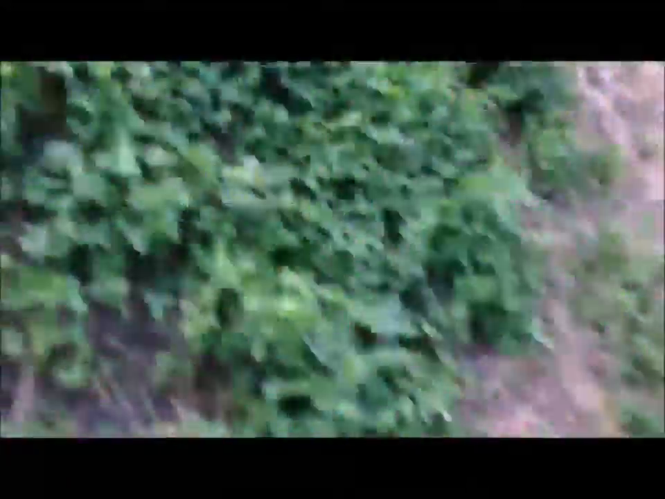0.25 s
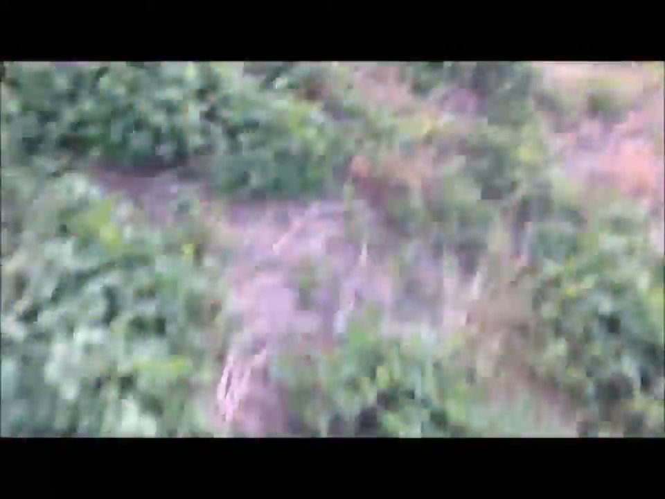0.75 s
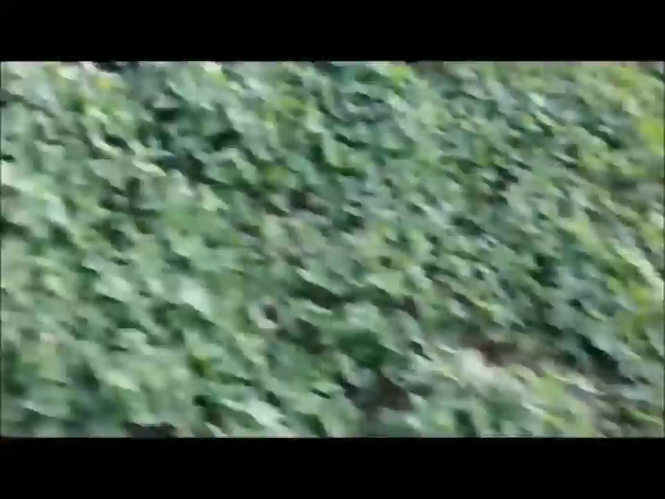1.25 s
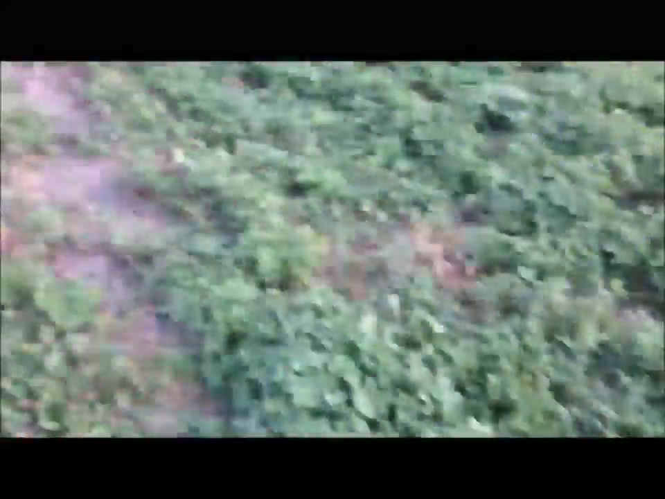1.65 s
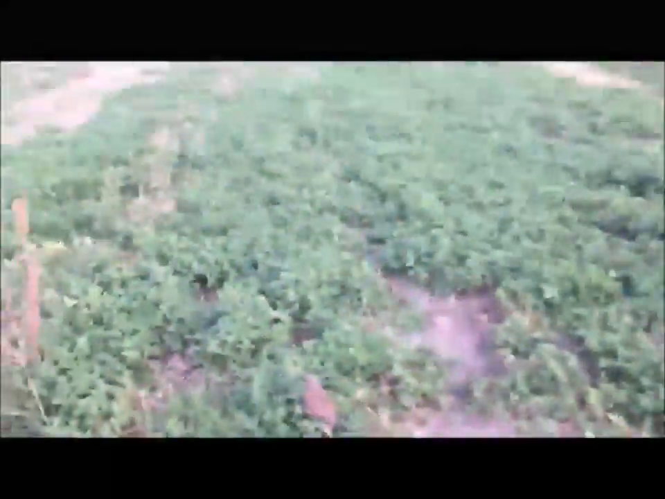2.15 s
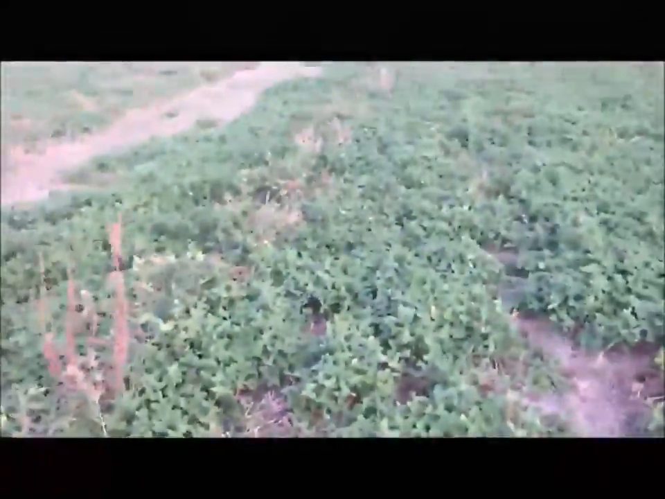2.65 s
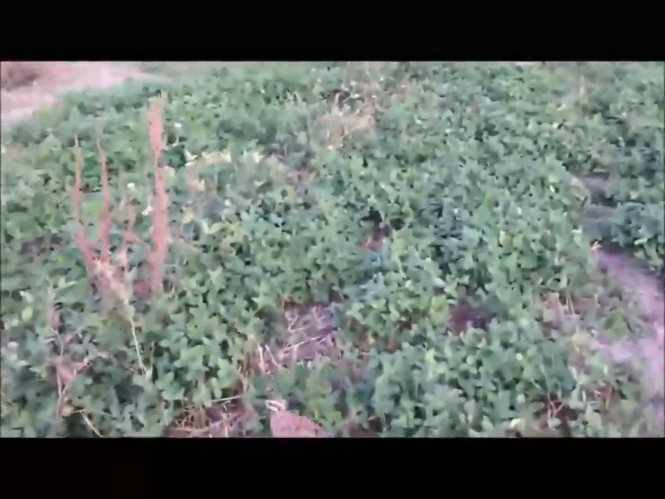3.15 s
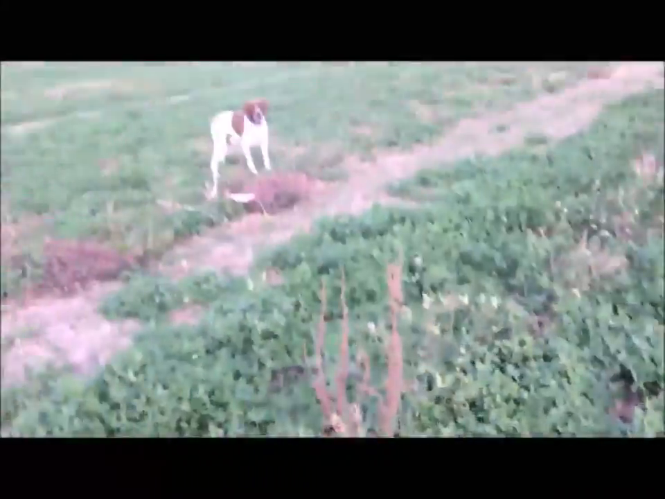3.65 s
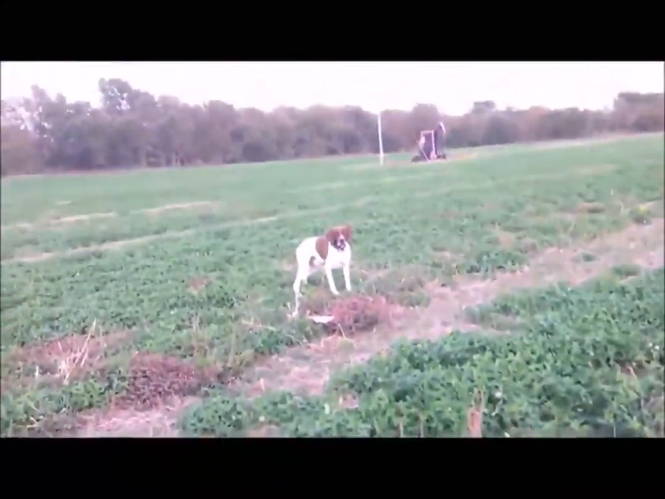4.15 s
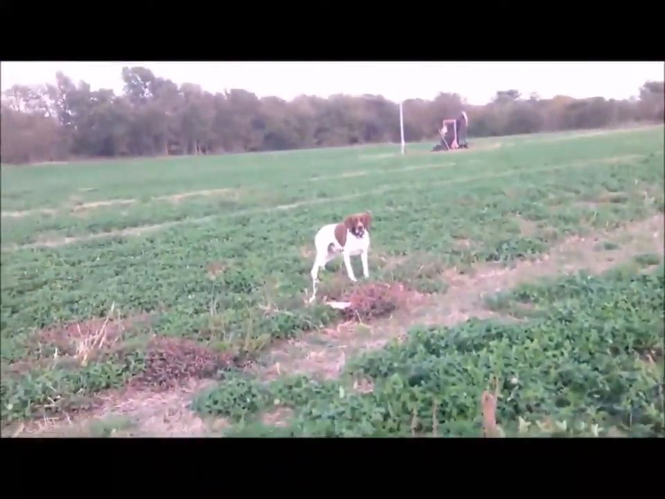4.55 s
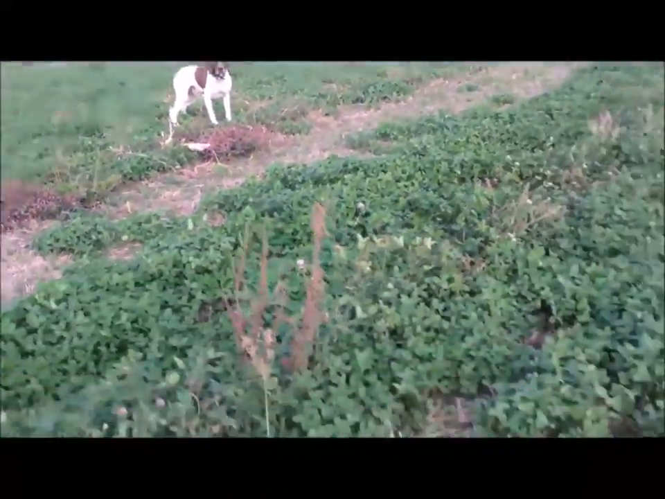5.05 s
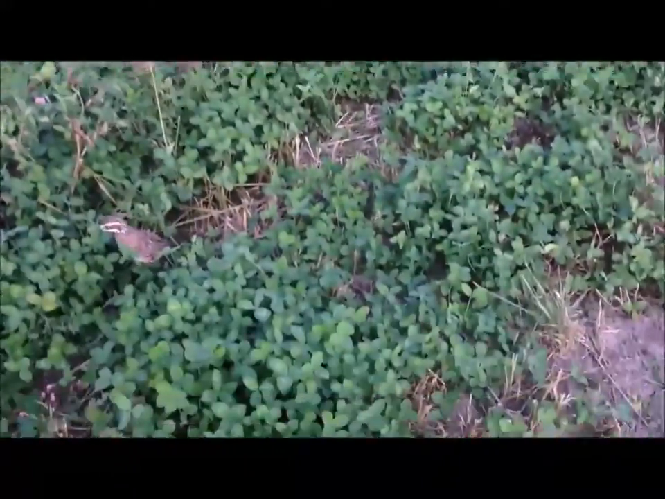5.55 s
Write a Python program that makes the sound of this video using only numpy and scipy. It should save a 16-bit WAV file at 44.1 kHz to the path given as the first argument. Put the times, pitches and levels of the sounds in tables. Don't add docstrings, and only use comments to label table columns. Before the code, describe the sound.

Loud rustling and snapping through leafy weeds dies down within two seconds, then a nearby quail gives sagging whistles with quick chirping flips.

```python
import sys
import numpy as np
from scipy import signal
from scipy.fft import dct
from scipy.io import wavfile
from scipy.ndimage import uniform_filter1d

SR = 44100
rng = np.random.default_rng(int(sys.argv[2]) if len(sys.argv) > 2 else 0)


def materialize(psi):
    bounded = np.clip(np.atleast_2d(psi).T, -1, 1)
    quanta = np.round(bounded * 32767).astype(np.int16)
    wavfile.write(sys.argv[1], SR, quanta)


def nominal_scale(level):
    x = np.asarray(level, float) / 20
    return 10 ** x


N = 256220


def evened(x):
    return x / np.sqrt(np.mean(x ** 2) + 1e-20)


def smoothed_twice(x, size):
    return uniform_filter1d(uniform_filter1d(x, size), size)


def add(mix, s, sound):
    part = mix[round(s * SR):][:len(sound)]
    part += sound[:len(part)]


def events(source, table):
    track = np.zeros(N)
    for row in table:
        add(track, *source(*row))
    return track


def coloured(x, points):
    f, db = np.transpose(points)
    hz = np.abs(np.fft.fftfreq(4096, 1 / SR))
    log_gain = np.log(nominal_scale(np.interp(np.log(hz + 1), np.log(f), db)))
    taps = np.fft.ifft(np.exp(np.conj(signal.hilbert(log_gain)))).real[:2048]
    return evened(signal.oaconvolve(x, taps)[:N])


def flicker(ms, depth_db):
    slow = smoothed_twice(rng.standard_normal(N), int(ms * SR / 1000) + 1)
    return nominal_scale(depth_db * evened(slow))


def strokes(rows):
    t = np.arange(0, N + 64, 32) / SR
    power = np.zeros(len(t))
    for s, db, rise_s, fall_s in rows:
        drop_db = 20 * np.maximum((s - t) / rise_s, (t - s) / fall_s)
        power += nominal_scale(2 * (db - drop_db))
    return np.interp(np.arange(N) / SR, t, power)


def rustle(power, colour, per_s, spread_db, crackle_db, ms, depth_db):
    smooth = rng.standard_normal(N)
    struck = rng.random(N) < per_s / SR
    size = rng.exponential(1, N)
    crackle = np.sign(smooth) * struck * nominal_scale(spread_db * np.minimum(size, 2.6))
    decay = signal.lfilter([1], [1, -np.exp(-1000 / SR / 2.5)], np.abs(crackle))
    crackle = crackle + 0.5 * smooth * decay
    drive = (smooth + nominal_scale(crackle_db) * evened(crackle)) * flicker(ms, depth_db)
    return np.sqrt(power) * coloured(drive, colour)


def leg_power():
    # (time of peak [s], peak level [dB], rise [s], fall [s])
    sweeps = [(.05, -44.5, 0.14, 0.21), (.24, -46, 0.083, 0.082), (.305, -33.5, 0.017, 0.42),
              (.352, -24, 0.053, 0.06), (.443, -29.5, 0.0044, 0.042), (.495, -29.5, 0.04, 0.029),
              (.551, -27.5, 0.0038, 0.0081), (.635, -33.5, 0.06, 0.095), (.695, -22.5, 0.087, 0.1),
              (.82, -67, .05, 0.75), (.992, -42.5, .012, 0.061), (1.045, -34, 0.06, 0.16),
              (1.09, -35, 0.11, 0.14), (1.187, -32.5, 0.043, 0.04), (1.291, -38, .012, 0.12),
              (1.35, -40, 0.27, 0.084), (1.5, -44.5, 0.033, 0.13), (1.58, -45, 0.33, 0.026),
              (1.64, -55.5, 0.028, 3.2), (1.97, -51, 0.029, 0.18), (2.05, -51.5, 0.082, 0.23),
              (2.43, -58.5, 0.89, 0.065), (2.57, -48.5, 0.059, .24), (2.82, -55.5, 0.9, .09),
              (3.13, -50.5, 0.034, 0.91), (3.42, -53.5, 0.78, 0.087), (3.75, -60, 0.54, 0.23),
              (4.22, -67.5, 0.04, 0.06), (5.81, -56, 0.68, .8)]
    return strokes(sweeps)


def patchy(x, depth_db):
    z = signal.stft(x, nperseg=512)[2]
    field = uniform_filter1d(uniform_filter1d(rng.standard_normal(z.shape), 9, 0), 6, 1)
    gain = nominal_scale(depth_db * evened(field) - 0.115 * depth_db ** 2)
    return signal.istft(z * gain, nperseg=512)[1][:N]


def leaf_hiss(legs):
    # (frequency [Hz], level [dB per Hz])
    leaf_colour = [(710, -32), (1200, -9.5), (2500, -3), (2720, -1.5), (3300, -2.5), (5990, -2), (8250, -5),
                   (14700, -12), (15300, -14)]
    # (frequency [Hz], level [dB per Hz])
    tip_colour = [(2500, -29), (4300, -11), (5200, -2.5), (6200, 0), (7200, -4), (9000, -21.5)]
    still_db, tip_ceiling_db = -68.5, -48
    leaves = nominal_scale(1.5) * rustle(legs + nominal_scale(2 * still_db), leaf_colour, per_s=790, spread_db=8.0,
                               crackle_db=-4.5, ms=6.7, depth_db=1.0)
    tip_power = np.minimum(legs, nominal_scale(2 * tip_ceiling_db))
    tips = nominal_scale(-7.5) * rustle(tip_power, tip_colour, per_s=230, spread_db=5.0,
                              crackle_db=-2.5, ms=9, depth_db=2.0)
    return patchy(leaves + tips, depth_db=2.5)


def stem_crunch(legs):
    # (time of peak [s], peak level [dB], rise [s], fall [s])
    crunches = [(.13, -52.5, 0.66, 0.031), (.21, -52.5, 0.076, 0.22), (.36, -32, 0.083, 0.033),
                (.48, -31, 0.046, 0.12), (.69, -43, 0.16, 0.11), (.9, -51, 0.093, 0.076),
                (1.18, -36, 0.028, 0.051), (1.52, -49.5, 0.077, 0.037), (1.57, -46, 0.11, 0.033),
                (1.86, -58.5, 0.11, 0.041), (2.2, -52.5, 0.034, 0.14), (2.57, -53.5, 0.043, 0.2),
                (2.86, -60, 0.14, 0.069), (3.33, -51.5, 0.059, 0.14), (4.1, -74, 2.1, 3.8),
                (4.352, -62, 0.0066, 0.01)]
    # (frequency [Hz], level [dB per Hz])
    stem_colour = [(200, -28.5), (400, -2), (650, 0), (1000, -2.5), (1600, -10), (3000, -25)]
    leg_share_db = -10.5
    power = strokes(crunches) + legs * nominal_scale(2 * leg_share_db)
    return nominal_scale(-1.5) * rustle(power, stem_colour, per_s=160, spread_db=5.0,
                              crackle_db=-4.5, ms=6.4, depth_db=2.5)


def snap(s, db, hz):
    ring_ms, tick_ms, shake_ms = 0.75, 0.14, 3.6
    ms = np.arange(900) * 1000 / SR
    grit = np.diff(rng.standard_normal(901)) / 2.2
    ring = np.sin(2 * np.pi * hz * ms / 1000) * np.exp(-2 * ms / ring_ms)
    grit_gain = 0.42 * np.exp(-ms / tick_ms) + 0.14 * np.exp(-ms / shake_ms)
    return s, 0.76 * nominal_scale(db) * (ring + grit * grit_gain)


def stem_snaps():
    # (time [s], peak level [dB], centre [Hz])
    snaps = [(0.0466, -25, 6950), (0.178, -32.5, 4010), (0.2864, -28, 2590), (0.303, -18, 6000),
             (0.3082, -20, 2720), (0.3525, -0.5, 5800), (0.359, -12, 5500), (0.4407, -15.5, 2600),
             (0.447, -19, 5000), (0.4891, -8.5, 2800), (0.526, -19.5, 1700), (0.532, -34, 1700),
             (0.5505, -22, 6500), (0.555, -18, 4000), (0.571, -23, 3280), (0.588, -20, 2900),
             (0.6135, -24, 2720), (0.632, -17, 4650), (0.708, -7, 6000), (0.9053, -36, 4700),
             (0.929, -27, 4190), (0.9855, -35, 6040), (0.991, -21, 3500), (1.0179, -21, 3580),
             (1.0552, -24, 7100), (1.088, -19.5, 5580), (1.1, -26, 6500), (1.125, -26, 3500),
             (1.169, -31.5, 3000), (1.177, -22, 4880), (1.187, -19.5, 5960), (1.2711, -31, 2640),
             (1.287, -29, 6300), (1.492, -39, 4380),
             (1.9025, -28.5, 5100), (1.9661, -27, 2700), (1.969, -26, 6850), (1.988, -36, 5000),
             (2.058, -34, 5700), (2.519, -29.5, 5560), (2.564, -32, 5900), (2.551, -40, 5000),
             (2.6076, -34, 6250), (2.63, -37, 4000), (3.087, -44, 4200), (3.097, -28, 3770),
             (3.1419, -31, 3650), (3.375, -32, 2500), (3.4152, -33.5, 1900), (3.442, -32, 4200),
             (3.7403, -34, 5400), (3.932, -32, 4540), (4.064, -36, 4300), (4.253, -38, 3130),
             (4.395, -33, 3490), (4.675, -38, 5550), (5.114, -40.5, 6000), (5.445, -31.5, 4350)]
    return events(snap, snaps)


def grip_rub(legs):
    # (time of peak [s], peak level [dB], rise [s], fall [s])
    jolts = [(.07, -46.5, 0.12, 0.3), (.25, -42.5, .05, 0.089), (.36, -36, 0.08, .02),
             (.42, -42, 0.022, .1), (.5, -25.5, 0.11, 0.019), (.56, -36, 0.076, 0.03),
             (.71, -29, 0.056, 0.1), (1.03, -44.5, 0.068, 0.12), (1.6, -58.5, 0.22, 1),
             (2.22, -58, 0.066, 0.051), (2.83, -64.5, 1.3, 0.2), (3.14, -57.5, 0.099, 0.49),
             (3.38, -54.5, 0.42, 0.085), (4.24, -69, 0.054, 0.017), (4.3, -41, .02, .07),
             (4.36, -36, 0.044, 0.019), (4.45, -43.5, 0.034, 0.029), (4.58, -52.5, 0.034, 0.073),
             (4.68, -54, 0.17, 0.024), (4.98, -61.5, 0.38, 0.15), (5.232, -50.5, .02, 0.057),
             (5.81, -56, 0.11, .2)]
    # (frequency [Hz], level [dB per Hz])
    grip_colour = [(30, -42), (80, -20.5), (150, 0.5), (250, 2.5), (400, -4.5), (700, -20), (1500, -65.5)]
    leg_share_db = -15.5
    power = strokes(jolts) + legs * nominal_scale(2 * leg_share_db)
    return nominal_scale(-5.0) * rustle(power, grip_colour, per_s=75, spread_db=4.5,
                              crackle_db=-6.5, ms=79, depth_db=2.5)


def thud(s, db, hz, t60):
    t = np.arange(3000) / SR
    attack = 1 - np.exp(-t * hz / 0.39)
    return s, 1.54 * nominal_scale(db - 60 * t / t60) * attack * np.sin(2 * np.pi * hz * t)


def housing_thuds():
    # (time [s], peak level [dB], pitch [Hz], t60 [s])
    thuds = [(0.199, -21.5, 1230, 0.0038), (0.414, -27.5, 291, 0.049), (0.487, -24.5, 400, 0.051),
             (0.524, -42, 350, 0.025), (0.546, -32, 394, 0.037), (0.898, -33.5, 322, 0.021),
             (1.169, -28.5, 694, 0.014), (1.494, -38, 313, 0.046), (1.511, -31.5, 353, 0.02),
             (1.561, -36.5, 490, 0.015), (1.583, -43, 850, 0.017), (1.853, -38, 910, 0.0078),
             (2.2, -40, 610, 0.0098), (2.222, -39.5, 500, 0.01), (2.227, -41, 980, 0.0072),
             (3.415, -47, 900, 0.01), (3.324, -42.5, 514, 0.033), (3.372, -40.5, 342, 0.028),
             (4.225, -44.5, 155, 0.071), (4.295, -33, 248, 0.028), (4.315, -32, 167, 0.03),
             (4.346, -27, 190, 0.025), (4.352, -25, 380, 0.01), (4.36, -38, 158, 0.06),
             (4.433, -31, 210, 0.043), (4.444, -25, 190, 0.043), (4.473, -42, 222, 0.042),
             (4.495, -40.5, 196, 0.048), (4.576, -37.5, 230, 0.041), (5.229, -33, 230, 0.026)]
    return events(thud, thuds)


def voice(hz, db, overtone_db):
    # (frequency [Hz], level re fundamental [dB])
    overtones = [(2600, -16), (3400, -7), (3850, -21.5), (4400, -13.5), (5000, -24), (5700, -16.5),
                 (7500, -17), (12000, -48)]
    phase = 2 * np.pi * (np.cumsum(hz) / SR + rng.random())
    f, re_db = np.transpose(overtones)
    over = 0
    for k in (2, 3):
        over = over + nominal_scale(np.interp(k * hz, f, re_db) - 2.8 * (k - 3.5)) * np.sin(k * phase)
    return np.sqrt(2) * nominal_scale(db) * (np.sin(phase) + nominal_scale(overtone_db) * over)


def note(rows, bright_db):
    s, hz, db = np.transpose(rows)
    t = np.arange(s[0], s[-1], 1 / SR)
    waver = smoothed_twice(rng.standard_normal((3, SR)), 250)[:, :len(t)]
    glide_hz = uniform_filter1d(np.interp(t, s, hz), 300, mode="nearest")
    glide_hz = glide_hz * (1 + 0.007 * evened(waver[0]))
    level_db = np.interp(t, s, db) + 1.7 * evened(waver[1])
    sound = voice(glide_hz, level_db, bright_db + 3.5 * evened(waver[2]))
    fade = np.clip(np.minimum(t - s[0], s[-1] - t) / 0.0021, 0, 1)
    return s[0], sound * fade


def flip(s, land_db, arch_db, arch_hz, tail_ms):
    # (time [ms], share of the way from landing to arch [1])
    arch = [(-25, -0.1), (-21, 0.55), (-17, .93), (-10, 1), (-5.5, .9), (-3, .55), (-0.5, 0.08)]
    # (time [ms], level re arch [dB])
    arch_level = [(-23, -19), (-18.5, -16), (-13, -4), (-5, 1.5), (-5, -3), (-3.5, -11.5)]
    landing_hz, rest_hz, sink_ms = 2590, 1800, 3.6
    ms = np.arange(arch[0][0], 1.7 * tail_ms, 1000 / SR)
    share = uniform_filter1d(np.interp(ms, *np.transpose(arch)), 60, mode="nearest")
    sink_hz = (rest_hz - landing_hz) * (1 - np.exp(-np.maximum(ms, 0) / sink_ms))
    hz = landing_hz + share * (arch_hz - landing_hz) + sink_hz
    when, re_db = np.transpose(arch_level)
    peak = 0.24 * tail_ms - 1.2
    tail = [peak, peak + 0.4 * tail_ms + 1.1, peak + 0.8 * tail_ms + 1.5, 1.7 * tail_ms + 3]
    tail_db = [land_db + 2, land_db - 2.5, land_db - 14, land_db - 36]
    db = np.interp(ms, np.maximum.accumulate([*when, *tail]), [*(re_db + arch_db), *tail_db])
    db = uniform_filter1d(db, 30, mode="nearest")
    return s + ms[0] / 1000, voice(hz, db, overtone_db=3.0 + 0.5 * (land_db + 30))


def quail():
    # (time [s], pitch [Hz], level [dB])
    long_notes = [
        [(0.02, 1923, -66), (0.082, 2026, -54), (0.126, 1797, -57), (0.234, 1845, -52.5), (0.29, 2100, -64)],
        [(1.605, 1874, -72), (1.615, 1860, -65), (1.68, 1752, -56.5), (1.71, 1647, -59), (1.78, 1700, -53),
         (1.856, 1608, -63.5), (1.896, 1725, -54.5), (1.912, 2085, -61), (1.92, 2200, -78)],
        [(2.358, 2025, -74), (2.378, 1865, -61), (2.398, 1755, -58), (2.448, 1714, -53), (2.508, 1595, -56.5),
         (2.604, 1553, -57.5), (2.642, 1780, -54), (2.66, 2560, -62)],
        [(3.305, 2055, -68), (3.33, 2030, -55), (3.375, 1800, -71), (3.43, 1642, -61), (3.548, 1360, -53),
         (3.632, 1630, -61), (3.716, 1636, -63), (3.75, 1820, -62), (3.767, 2370, -48)],
        [(4.275, 2290, -77), (4.288, 2240, -65.5), (4.35, 1815, -59), (4.384, 1820, -55), (4.426, 1667, -65.5),
         (4.516, 1646, -61), (4.536, 1790, -54.5), (4.552, 2430, -48.5)],
        [(5.205, 2150, -72), (5.214, 2150, -66), (5.228, 1970, -70.5), (5.288, 1632, -54), (5.368, 1554, -53.5),
         (5.454, 1423, -65.5), (5.522, 1675, -56.5), (5.543, 2500, -50)],
    ]
    # (time [s], pitch [Hz], level [dB])
    short_notes = [
        [(2.765, 1980, -69), (2.785, 1925, -61), (2.815, 1887, -60), (2.847, 2130, -57)],
        [(3.85, 2160, -55.5), (3.89, 2197, -48), (3.918, 2280, -45), (3.928, 2440, -41)],
        [(4.62, 2000, -63), (4.648, 1884, -53.5), (4.76, 1916, -52), (4.797, 2190, -48)],
        [(5.625, 2085, -65), (5.657, 2140, -65), (5.713, 2310, -50), (5.722, 2760, -56)],
    ]
    bright = [-10, -11, -16, -4, -2, -14, -6.5, -9.5, -6, -6]
    # (time of landing [s], landing level [dB], arch level [dB], arch pitch [Hz], tail [ms])
    flips = [(1.043, -30.5, -51, 4560, 2.5), (1.236, -36, -46, 4660, 3.7), (1.356, -32.5, -60, 4500, 2.3),
             (1.415, -36.5, -60, 4350, 2.1), (1.514, -37, -42, 4400, 2.6), (1.943, -44.5, -70, 4120, 11.6),
             (2.2644, -36, -41, 4750, 3.4), (2.678, -54, -66, 4100, 11), (2.876, -45, -51.5, 4420, 7.8),
             (3.252, -31, -37, 4650, 4.8), (3.788, -42, -51.5, 4280, 14), (3.9563, -43, -45, 4560, 12.3),
             (4.214, -33, -31.5, 4990, 3.4), (4.574, -43.5, -55.5, 4340, 13.7),
             (4.822, -42.5, -45.5, 4330, 15.5), (5.154, -34, -38, 4716, 4.1), (5.563, -43, -55.5, 4080, 13),
             (5.747, -39.5, -50, 4350, 6.5)]
    return events(note, zip([*long_notes, *short_notes], bright)) + events(flip, flips)


def peep(s, db, first_hz, last_hz, ms):
    hz = np.linspace(first_hz, last_hz, int(ms * SR / 1000))
    return s, voice(hz, db, overtone_db=-30) * signal.windows.tukey(len(hz), .6)


def far_bird():
    # (time [s], level [dB], first pitch [Hz], last pitch [Hz], length [ms])
    peeps = [
        (2.964, -65, 5020, 4500, 26),
        (3.008, -60, 5200, 4850, 16),
        (3.542, -62, 5250, 4740, 22),
        (4.058, -62, 5390, 4740, 12),
        (4.105, -58.5, 5200, 4880, 21),
        (4.613, -59.5, 5230, 4900, 19),
        (5.182, -61, 5300, 4820, 25),
    ]
    return events(peep, peeps)


def foliage(x):
    t = np.arange(4000) / SR
    sparse = rng.standard_normal(4000) * (rng.random(4000) < .08)
    taps = sparse * nominal_scale(-60 * t / 0.088) * (t > .002)
    return signal.oaconvolve(x, taps / np.linalg.norm(taps))[:N]


def open_air():
    # (frequency [Hz], level [dB per Hz])
    air_colour = [(18, -65), (30, -16.5), (155, -0.5), (397, -14), (429, -17.5), (635, -15.5),
                  (1950, -26.5), (4370, -26), (4980, -23), (15300, -22)]
    return nominal_scale(-63) * coloured(rng.standard_normal(N) * flicker(ms=7.1, depth_db=2.5), air_colour)


def scene():
    legs = leg_power()
    brush = leaf_hiss(legs) + stem_crunch(legs) + grip_rub(legs)
    sharp = stem_snaps() + housing_thuds() + quail() + far_bird()
    echo = nominal_scale(-15) * foliage(sharp)
    return (brush + sharp + echo + open_air())[None]


def starve(x):
    # (time of centre [s], length [ms], extra coarseness [dB])
    lapses = [(0.024, 30, 0.5), (0.222, 26, 1.5), (0.727, 30, 0.5), (1.033, 32, -0.5), (1.069, 23.2, 0),
              (1.111, 32, 0), (1.183, 35, -1.5), (1.313, 24, 0.5), (1.377, 25, -1), (1.442, 27, 0.5),
              (1.675, 24, 0), (1.709, 27, -0.5), (1.737, 22, -0.5), (1.826, 48, -2), (1.88, 22, -0.5),
              (1.945, 30, 4), (2.017, 30, 0), (2.095, 29, -1.5), (2.186, 25, -0.5), (2.535, 30, -0.5),
              (2.731, 32, -1.5), (2.784, 21, -1), (2.835, 29, -2.5), (2.871, 44, 2.5), (3.33, 27.5, -1),
              (3.395, 35, -1.5), (3.605, 32, -1), (3.672, 25, 0), (3.862, 43, -0.5), (3.971, 34, 0.5),
              (4.096, 44, 1.5), (4.247, 27, -1.5), (4.298, 44, 3), (4.336, 35, 1), (4.567, 41, 0),
              (4.63, 31, 1.5), (5.144, 37, 0.5), (5.25, 26, -0.5), (5.49, 46, 0), (5.579, 33, 0),
              (5.62, 30, 0.5), (5.656, 31, 0)]
    step_db = 9.5
    out = x.copy()
    for s, ms, extra_db in lapses:
        size = int(ms * SR / 1000)
        start = max(round(s * SR) - size // 2, 0)
        window = np.sqrt(signal.windows.tukey(size, .7))
        block = out[start:start + size] * window
        lines = dct(block, norm="ortho")
        hz = np.arange(size) * SR / 2 / size
        local_db = uniform_filter1d(20 * np.log10(np.abs(lines) + 1e-9), size // 12) + 6.0
        uneven_db = 2.2 * np.repeat(rng.standard_normal(40), size // 40 + 1)[:size]
        tilt_db = 2.2 * hz / 10000 - 9.1 * ((hz > 14900) | (hz < 350))
        step = nominal_scale(local_db + uneven_db + step_db + extra_db + tilt_db)
        kept = np.sign(lines) * step * np.floor(np.abs(lines) / step + 0.46)
        coarse = dct(kept + 0.095 * lines, type=3, norm="ortho")
        out[start:start + size] += window * (coarse - block)
    return out


def low_pass(x):
    return signal.sosfilt(signal.butter(12, 16480, fs=SR, output="sos"), x)


def record(dry):
    bass_cut = signal.butter(2, 95, "highpass", fs=SR, output="sos")
    band_limit = signal.firwin(301, 15350, fs=SR)
    x = signal.oaconvolve(signal.sosfilt(bass_cut, dry[0]), band_limit, "same")
    return low_pass(starve(x)[None])


dry = scene()
out = record(dry)
materialize(out)
```